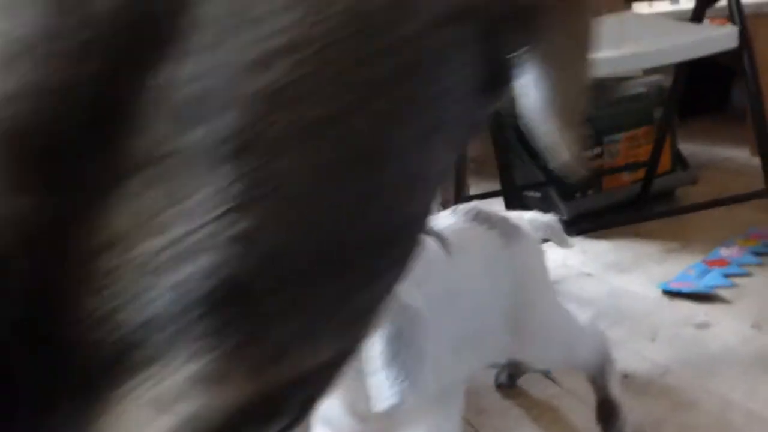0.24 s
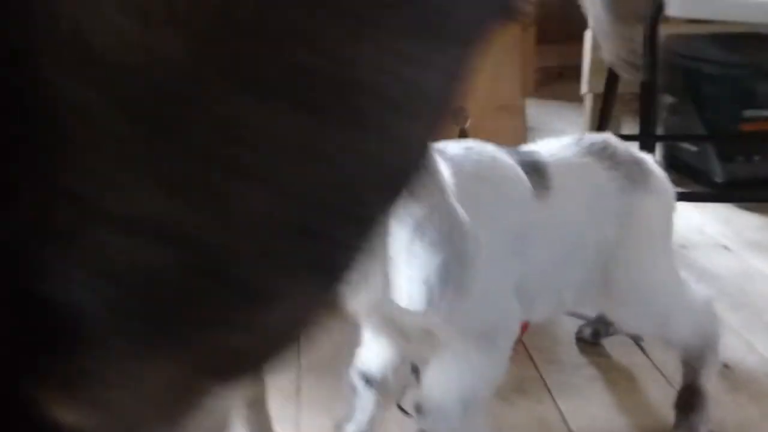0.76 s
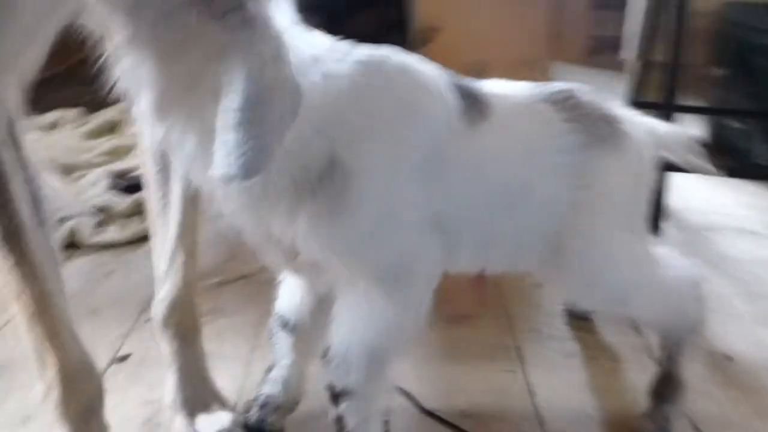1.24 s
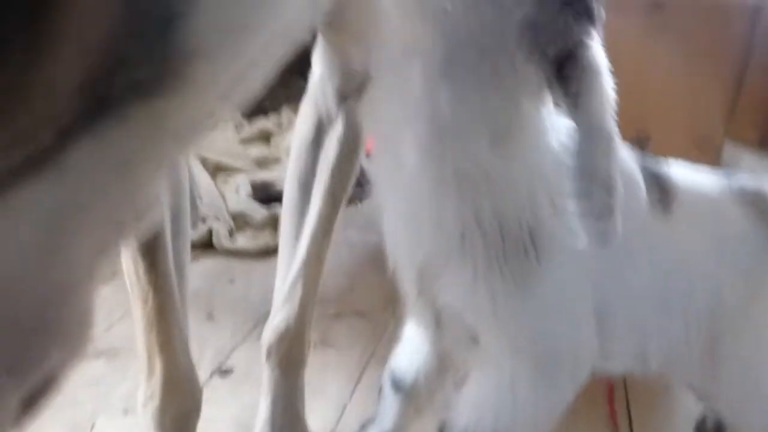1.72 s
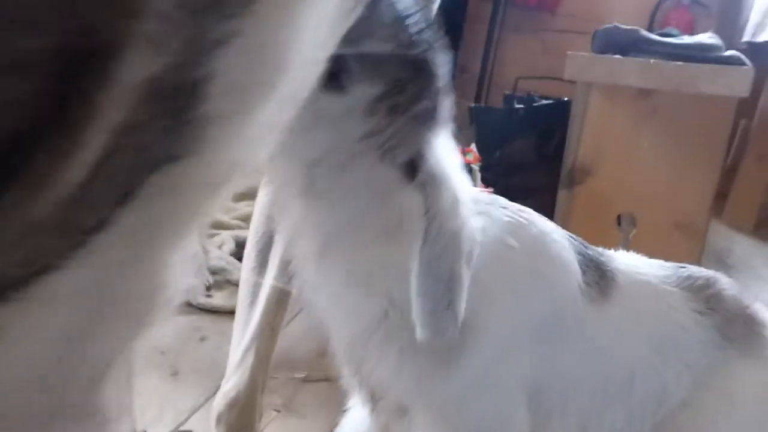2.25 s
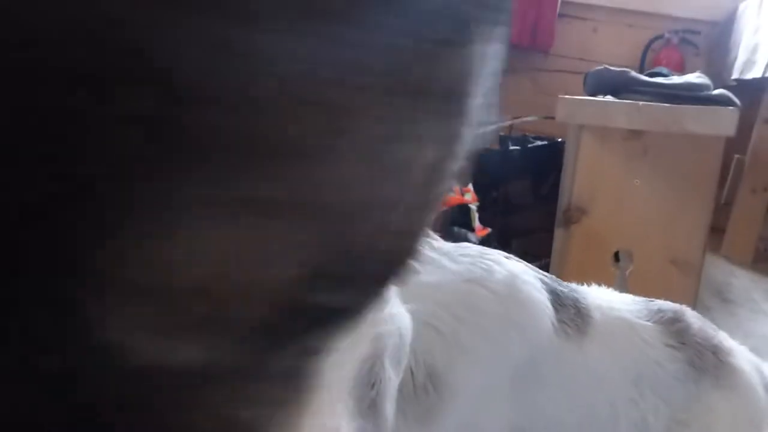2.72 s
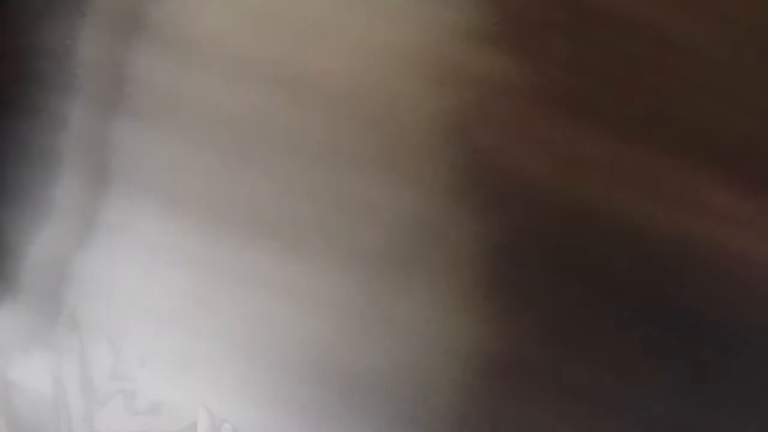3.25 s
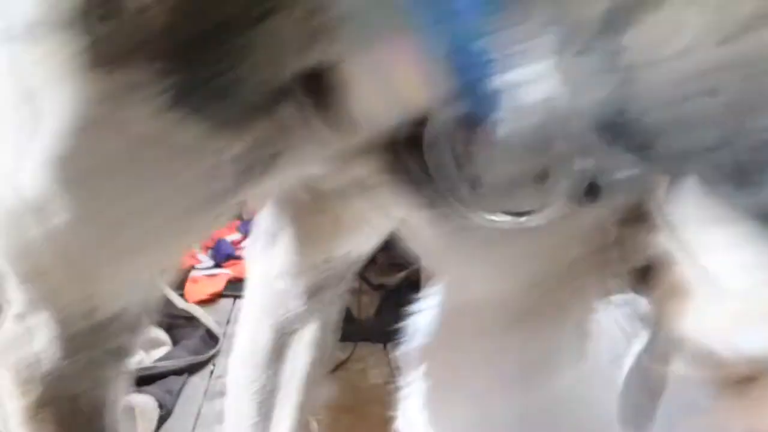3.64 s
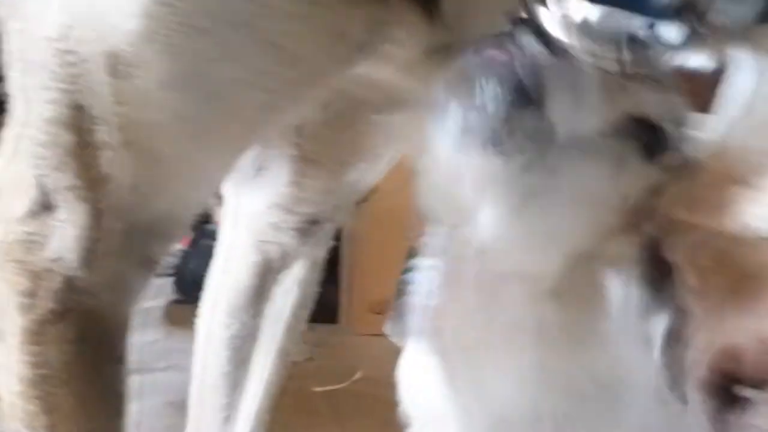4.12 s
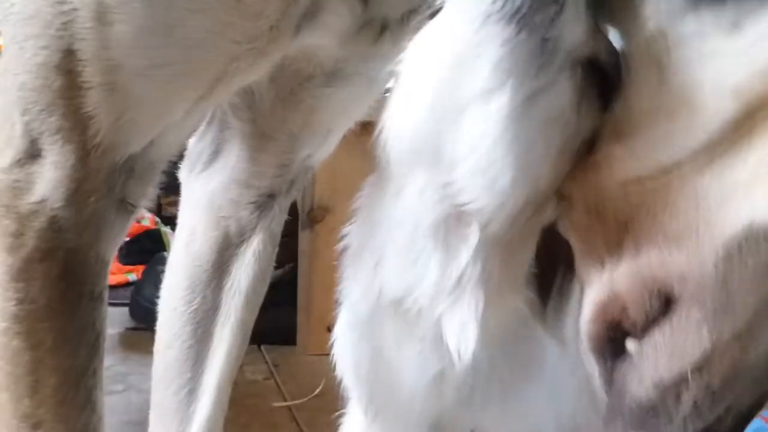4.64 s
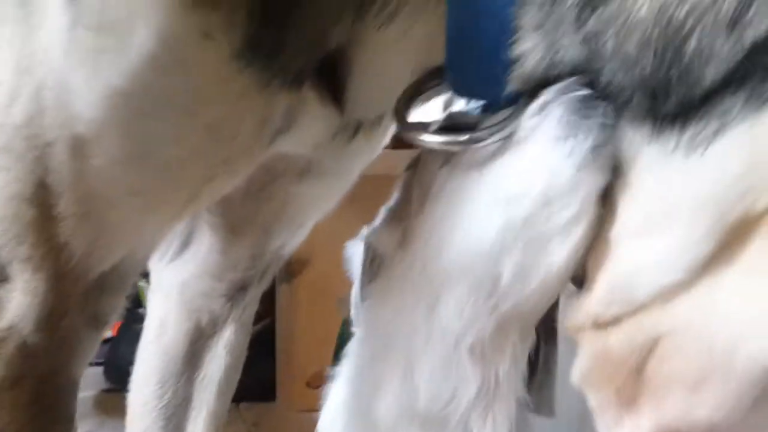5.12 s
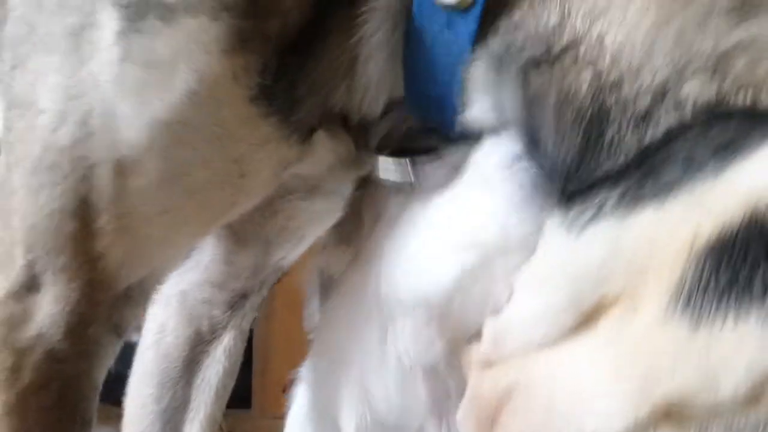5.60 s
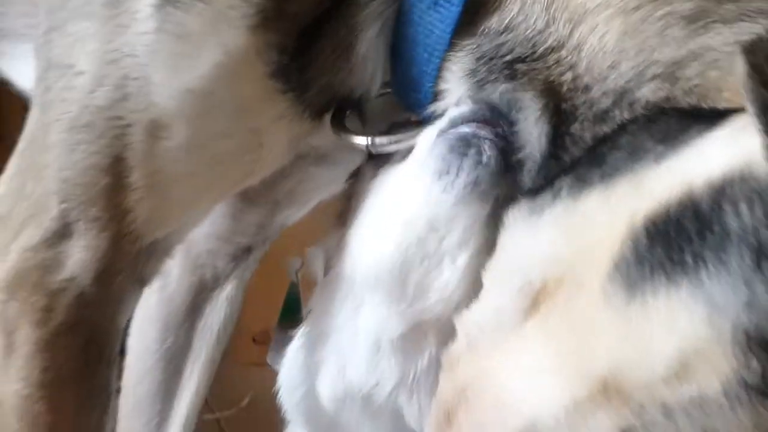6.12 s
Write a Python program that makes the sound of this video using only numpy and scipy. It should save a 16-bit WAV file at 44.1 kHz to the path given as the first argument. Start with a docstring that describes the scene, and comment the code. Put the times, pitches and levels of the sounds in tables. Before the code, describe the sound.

Dogs shuffle and tap on a wooden floor in a small room, then lick and nose close up, with one very loud sharp smack.

```python
"""Dogs lick and nose right beside a phone, after shuffling over a wooden floor in a small room.
Mouths and claws click and one dog snorts: noise bursts in bands. Paws thud as ringing board modes.
Noses sniff, fur brushes brightly once and a nostril whistles: filtered noise. Bodies shove over the boards
and fur rustles: grainy noise that follows the bustle. A short room tail returns a share of the clicks,
thuds and sniffs, over a steady stereo hush."""
import sys
import numpy as np
from scipy import signal
from scipy.fft import rfft, irfft, next_fast_len
from scipy.io import wavfile
from scipy.ndimage import uniform_filter1d

SR = 44100
rng = np.random.default_rng(int(sys.argv[2]) if len(sys.argv) > 2 else 0)


def invert_db(level):
    """Linear amplitude ratio for a level in decibels (20 dB per decade), elementwise."""
    return 10 ** (np.asarray(level, dtype=float) / 20)


def wav_out(sig):
    """Save sig, one row per channel (or a flat mono array), as 16-bit PCM at SR to the path in sys.argv[1]."""
    wavfile.write(sys.argv[1], SR, np.round(np.clip(np.atleast_2d(sig).T, -1, 1) * 32767).astype(np.int16))


N = 280917  # samples

# All peaks and levels are those ahead of the microphone.
# Lips, tongues and collars beside the phone:
# (time [s], peak [dB], centre [Hz], nominal half width [octaves], half length [ms])
MOUTH_CLICKS = [(.3694, -27, 2200, 0.56, 2.26), (1.548, -35, 1460, .47, 2.4),
                (1.8874, -23, 4470, 0.91, 0.18), (1.888, -31, 3450, 0.49, 2.5), (2.058, -48, 9000, .8, .3),
                (2.137, -35.5, 1500, .6, 0.84), (2.4783, -31, 5500, 1.5, 0.64),
                (2.483, -32, 10200, .6, 0.23), (2.5009, -30.5, 5660, 0.93, .32),
                (2.978, -37.5, 1490, 0.62, 1.3), (3.0605, -34.5, 1800, 1.46, 2.4),
                (3.1088, -41, 10500, 0.26, .4), (3.95, -34, 2270, 0.61, .11),
                (4.0218, -37.5, 1230, 0.31, 1), (4.0347, -28, 7000, 0.74, 0.5),
                (4.159, -32, 5800, 1.16, 2.8), (4.1645, -32, 10800, 0.15, 0.43),
                (4.3446, -24, 12000, 0.23, 0.27), (4.3476, -25, 10000, 0.19, 0.31),
                (4.3542, -30, 1520, 1.2, 0.64), (4.355, -17.5, 4660, 0.24, 0.41),
                (4.4006, -28, 3630, 0.52, 0.33), (4.479, -38, 9600, 0.31, .6),
                (4.4871, -29.5, 1310, 0.29, 0.41), (4.4875, -28, 4670, 0.35, 0.18),
                (4.6625, -26.5, 10900, 0.26, 0.33), (4.71, -21, 9500, .45, 1.3),
                (4.7125, 2.5, 9300, 0.49, 0.27), (4.7121, -14.5, 2560, 0.84, 0.72),
                (4.7128, -5, 8200, 0.33, 2.3), (4.7172, -10.5, 7500, 0.91, 1.35),
                (4.7967, -29, 6160, 1.14, .47), (4.901, -39, 12000, 0.45, .37),
                (4.917, -35.5, 11300, 0.3, .3), (4.926, -42, 10500, .3, 0.33),
                (4.976, -13.5, 4460, 2.7, 0.14), (4.982, -26.5, 3530, 0.24, 2.3),
                (4.9812, -22, 6600, 0.076, 1.5), (4.987, -18, 7000, 3.3, 1.75),
                (5.2588, -35.5, 10100, 0.16, .28), (5.311, -25.5, 5550, 1, 5.1),
                (5.318, -5.5, 7440, 0.3, 1), (5.3202, -14, 5800, 1.13, 2.4),
                (5.3224, -15.5, 6700, 0.19, 0.68), (5.323, -14.5, 4280, 0.77, 1.54),
                (5.532, -34, 12500, .4, .45), (5.538, -19, 6360, 0.26, 0.98),
                (5.5376, -25.5, 2970, 1.4, 1.45), (5.543, -25, 8950, 1.4, 0.39),
                (5.8025, -20, 3000, 0.56, 0.036), (5.978, -39, 1790, 0.83, 0.16),
                (6.1359, -23, 3690, 0.86, 0.05), (6.1745, -29, 6000, 1, .29),
                (6.1794, -26, 9500, 0.16, 0.36), (6.189, -29, 7950, 0.86, .3), (6.234, -30, 7000, 3.3, .26),
                (6.239, -33.5, 3400, 0.78, 0.28), (6.331, -22, 3600, 0.88, 0.068)]
# Claws on the floor, across the room; the two rows near 3.32 s are a noisy snort, with its room tail:
# (time [s], peak [dB], centre [Hz], nominal half width [octaves], half length [ms])
CLAWS_AND_SNORT = [(0.2776, -27, 7400, 0.42, 3.2), (.283, -28.5, 2000, 2, 1.05),
                   (.5211, -32.5, 1840, 0.47, 2.2), (0.657, -36.5, 1990, 0.99, 2),
                   (.7303, -30.5, 1200, .65, 0.23), (1.0852, -21.5, 1850, 0.058, .4),
                   (1.0871, -22.5, 3800, 1.1, 2.2), (1.288, -41, 3500, 0.66, 4.2),
                   (1.4168, -35.5, 4000, 0.71, 5.5), (1.845, -39, 3400, .85, 3),
                   (2.119, -40.5, 8000, 0.83, 2.7), (2.169, -40, 4000, .41, .54),
                   (2.213, -40, 9000, 0.65, 0.46), (2.313, -35, 2680, .56, 0.5),
                   (2.399, -34.5, 3820, 0.63, 2.2), (3.3197, -22.5, 6960, 0.79, 2.3),
                   (3.319, -28.5, 4600, 1.4, 13.7), (4.3524, -25.5, 10800, .25, 0.34),
                   (4.404, -32.5, 11100, .55, 1.9), (4.982, -23, 8000, 1.5, 1.8),
                   (5.0842, -33.5, 2470, 0.96, 0.27), (5.161, -37, 3800, 0.26, .28),
                   (6.029, -36, 11200, 0.8, 0.32)]
# Spells of faint crackle: (start [s], end [s], highest peak [dB], lowest centre [Hz], span above it [octaves])
CRACKLE_SPELLS = [(1.951, 2.55, -39, 2600, 2.3), (2.9, 3.159, -46, 3000, 1.9), (4.096, 4.7, -53, 5000, 1.4),
                  (5.399, 6.299, -44.5, 5000, 1.8)]
# Two narrow resonances, probably the microphone's, that colour every click:
# (frequency [Hz], width [Hz], gain [dB])
NARROW_RESONANCES = [(6600, 200, -7), (9050, 310, -9.5)]
# Paws on the boards: (time [s], peak [dB], favoured pitch [Hz], spread [octaves], ring time [factor])
PAW_BLOWS = [(.151, -40, 298, 0.62, 0.58), (.369, -28, 940, 0.48, 0.28), (.52, -41, 585, 0.41, .51),
             (.637, -37.5, 493, 0.5, 1.04), (.73, -30, 477, 0.68, 0.68), (.981, -27.5, 510, 0.23, .28),
             (1.039, -26.5, 510, 0.6, 0.71), (1.088, -24.5, 716, 1.2, 0.36), (1.144, -38, 417, 0.31, .8),
             (1.231, -34.5, 306, 0.18, 0.9), (1.352, -33, 327, 0.55, 0.65), (1.384, -27.5, 252, 0.4, 2.5),
             (1.41, -40, 278, 0.47, 1.3), (1.435, -37, 300, 0.38, 1.4), (1.46, -36.5, 320, .16, 2.3),
             (1.551, -28.5, 590, 0.95, 0.35), (1.668, -34, 303, 0.22, 1.06), (1.916, -36, 473, 0.57, 0.72),
             (1.975, -41, 370, 0.42, .54), (2.077, -41, 317, 0.34, 0.84), (2.263, -37, 450, 0.17, 0.4),
             (2.345, -41, 420, 0.39, 0.77), (3.036, -41, 460, 0.5, 0.6), (3.059, -36.5, 307, 1.22, 2.1),
             (3.097, -38, 407, 0.22, .9), (3.254, -41, 473, .4, 1.8), (3.323, -41, 433, 0.52, 1.7),
             (3.352, -36.5, 333, 0.38, 1), (3.697, -30.5, 367, .53, 0.7), (4.146, -42.5, 271, .45, 1.7),
             (4.466, -39, 550, .65, .38), (4.4883, -29, 1070, 0.72, 0.15), (4.712, -28, 506, 0.67, 0.12),
             (4.796, -41.5, 533, 0.97, 0.51), (4.832, -42.5, 540, .32, 0.39),
             (4.934, -44.5, 297, 1.02, 0.51), (4.985, -35.5, 990, 0.51, .32), (5.084, -34, 730, 0.66, 0.2),
             (5.324, -33.5, 940, .6, 0.27), (5.802, -37, 696, 0.8, 0.21), (5.874, -47, 206, .34, .54),
             (6.145, -25, 272, 0.5, 1.07)]
# Modes of the boards: (frequency [Hz], relative level [dB], t60 before the paw's ring factor [s])
BOARD_MODES = [(193.7, -1.5, 0.13), (256, -1.5, 0.042), (316, 1, 0.053), (392.7, 2, 0.071), (460, 6, 0.05),
               (561, 3.5, 0.064), (730, 10.5, 0.066), (940, 12, 0.054), (1200, 16, 0.042)]
# Air drawn through a nose; the row from 4.989 to 5.25 s is a bright brushing of fur:
# (start [s], end [s], level [dB], bright band against dull [dB])
SNIFFS_AND_BRUSH = [(0, 0.09, -50, 0), (.14, 0.196, -53.5, 5), (2.953, 3.135, -65, -16),
                    (3.202, 3.445, -53.5, -23), (4.989, 5.25, -64, 5), (5.084, 5.25, -57, -11),
                    (5.395, 5.438, -57.5, -20), (6.02, 6.051, -60.5, -16), (6.206, 6.37, -72, -7)]
# How busily the dogs move: (time [s], bodies on the boards [dB], fur against bodies [dB])
MOVEMENT = [(0, -48.5, 2.5), (.22, -51.5, -0.5), (.75, -48, -1.5), (.95, -51, 2), (1.12, -46.5, -3),
            (1.42, -46.5, -0.5), (1.63, -49.5, -3), (1.79, -56.5, -2.5), (2.15, -52, -1.5),
            (2.47, -55.5, 2), (2.79, -62.5, 2), (3.0, -54.5, -2), (3.3, -52, -1.5), (3.65, -50, -1.5),
            (3.9, -54, -4), (4.15, -53, 0.5), (4.45, -53.5, -1), (4.76, -62.5, 0.5), (5.0, -60.5, -1),
            (5.501, -57.5, -1), (5.95, -63, 2.5), (6.2, -53.5, -3), (6.37, -54, 3.5)]
# A body shoves across the boards: (middle [s], length [s], level over the bustle [dB])
BODY_SHOVES = [(3.08, 0.13, 6), (3.353, 0.22, 5), (3.746, 0.069, 1.5), (5.175, .14, 5.5), (5.4, 0.13, 5.5),
               (6.166, 0.057, 6)]
# Colour of bodies on the boards: (frequency [Hz], relative level per Hz [dB])
SHUFFLE_COLOUR = [(29, -72), (50, -42), (69, -56), (92, -24), (134, -21), (171, 3.5), (265, -2), (420, 2.5),
                  (967, -6), (2500, -16.5), (3250, -69), (5500, -120)]
# Colour of brushing fur, before its tilt: (frequency [Hz], relative level per Hz [dB])
RUSTLE_COLOUR = [(410, -57), (700, -8.5), (1870, -6), (2270, -7), (2730, -7.5), (6150, -10.5), (7990, -17),
                 (9990, -12.5), (14600, -25), (15400, -23), (16000, -61)]
# Left-right likeness of the movement: (frequency [Hz], correlation before clipping to -1..1 [1])
MOTION_LIKENESS = [(60, 0.57), (180, 0.98), (550, 0.95), (1650, 0.5), (4970, 0.56), (15000, 0.13)]
# Phase gap between the two microphone ports: (frequency [Hz], lead of the left [rad])
PORT_PHASE = [(0, 0), (780, 0.23), (1460, -0.4), (3190, -1.2), (3960, -0.9), (5170, 0.5), (7060, -0.4),
              (9910, 0.048), (10200, -0.1), (11400, 0.16), (14400, -0.4), (15600, -0.1), (16000, 0.1),
              (16400, 0.19)]
# Decay of the small room: (frequency [Hz], t60 [s])
ROOM_DECAY = [(150, 0.13), (600, 0.075), (2000, 0.21), (6500, 0.2), (10000, 0.14), (15000, 0.046)]
# Colour of the room's hush: (frequency [Hz], relative level per Hz [dB])
HUSH_COLOUR = [(15, -40.5), (25, -23), (145, 12), (384, -14.5), (545, -3), (863, -4.5), (1070, -1),
               (1890, -12), (2280, -7.5), (3160, -14), (10700, -45), (14400, -30), (16000, -42)]
# Left-right likeness of the hush: (frequency [Hz], correlation before clipping to -1..1 [1])
HUSH_LIKENESS = [(60, 0.5), (150, 1.5), (380, -0.98), (950, -1.04), (2380, -0.34), (5980, -0.5),
                 (15000, -1)]
# Response shared by both microphone ports: (frequency [Hz], gain [dB])
MIC_RESPONSE = [(20, -17), (60, -10), (130, -2.5), (300, 1.83), (12000, -1.35), (15000, 4), (15700, -12),
                (16500, -26), (17500, -62.5)]
# Balance of the ports: (frequency [Hz], left over right [dB])
PORT_BALANCE = [(60, -1.1), (500, -1.2), (1200, 1.2), (2500, .9), (5000, .3)]


def evened(x):
    """Scales to rms 1."""
    return x / np.sqrt(np.mean(x ** 2) + 1e-20)


def read(points, hz):
    """Value of a table on a log-frequency axis."""
    f, value = np.transpose(points)
    return np.interp(np.log(hz + 1), np.log(f + 1), value)


def add(mix, s, sound):
    """Mixes a sound in at time s."""
    part = mix[round(s * SR):][:len(sound)]
    part += sound[:len(part)]


def click(hz, octaves, half_ms, noise):
    """A snap and a spatter of noise that swells and breaks off, through two resonances and the click's band."""
    u = np.arange(len(noise)) / SR * 1000 / (2 * max(half_ms, .05))
    swell = (1 - np.exp(-u / .15)) * np.exp(-u ** 3)
    drive = noise * swell * min(half_ms, 1)
    drive[0] += 1.2  # the snap
    for f, width, db in NARROW_RESONANCES:
        drive = drive + invert_db(db) * signal.lfilter(*signal.iirpeak(f, f / width, SR), drive)
    reach = np.array([-abs(octaves) - .02, abs(octaves) + .015])
    edges = np.clip(hz * 2. ** reach, 50, SR * .48)
    banded = signal.sosfilt(signal.butter(2, edges, "band", fs=SR, output="sos"), drive)
    # a duller low body under the snap, stronger in wide clicks
    body = signal.lfilter(*signal.butter(1, [500, 3000], "band", fs=SR), drive)
    sound = banded + invert_db(-12) * min(abs(octaves), 1) ** 2 * body
    return sound / abs(sound).max()


def crackle_ticks():
    """Faint ticks fall at random within each spell, at random levels and pitches."""
    ticks = []
    for start, end, db, low_hz, span in CRACKLE_SPELLS:
        for when, faint, high in rng.random((20, 3)):  # twenty ticks a spell
            s = start + when * (end - start)
            ticks.append((s, db - 7 * faint, low_hz * 2 ** (span * high), .51, .53))
    return ticks


def clicks():
    """Direct clicks and the share that each sends to the room; a louder mouth click is nearer, so sends less."""
    direct, to_room = np.zeros((2, N))
    rows = [(row, -3.5) for row in CLAWS_AND_SNORT]
    for row in MOUTH_CLICKS + crackle_ticks():
        rows.append((row, -15.5 - .25 * (row[1] + 30)))  # room share [dB]
    for (s, db, hz, octaves, half_ms), room_db in rows:
        sound = invert_db(db) * click(hz, octaves, half_ms, rng.standard_normal(2048))
        add(direct, s, sound)
        add(to_room, s, invert_db(room_db) * sound)
    return direct, to_room


def thuds():
    """Each paw rings the slightly detuned board modes near the pitch that its pad favours."""
    out, t = np.zeros(N), np.arange(8000) / SR
    for s, db, centre_hz, spread, ring in PAW_BLOWS:
        sound = np.zeros(len(t))
        for hz, mode_db, t60 in BOARD_MODES:
            away = np.log2(hz / centre_hz) / max(spread, .1)
            decay_db = 60 * t / (t60 * max(ring, .1))
            detuned_hz = hz * (1 + .017 * rng.uniform(-1.5, 1))
            sound += invert_db(mode_db - 9.2 * away ** 2 - decay_db) * np.sin(2 * np.pi * detuned_hz * t)
        sound *= 1 - np.exp(-t * centre_hz / .57)  # a softer pad loads the board more slowly
        add(out, s, invert_db(db) * sound / abs(sound).max())
    return out


def sniffs_and_brush():
    """Smooth rushes of noise, part dull and part bright: sniffed air and one bright brushing of fur."""
    out = np.zeros(N)
    for start, end, db, bright_db in SNIFFS_AND_BRUSH:
        noise = rng.standard_normal(round((end - start) * SR))
        dull = signal.lfilter(*signal.butter(1, [1200, 5500], "band", fs=SR), noise)
        bright = signal.lfilter(*signal.butter(1, [7000, 14000], "band", fs=SR), noise)
        rush = evened(dull + invert_db(bright_db) * bright)
        add(out, start, invert_db(db) * rush * signal.windows.tukey(len(noise), .6))
    return out


def whistle():
    """A nostril whistles as the dog draws air: noise in a narrow resonance of fixed width that climbs in pitch."""
    start_s, length_s, level_db, edge_db = 6.19, .17, -62, -16
    low_hz, rise_hz_per_s, width_hz = 12000, 24000, 700
    t = np.arange(N) / SR - start_s
    u = t / length_s
    pole = np.exp(-np.pi * width_hz / SR)
    fuzz = signal.lfilter([1], [1, -pole], rng.standard_normal(N) + 1j * rng.standard_normal(N))
    hz = low_hz + rise_hz_per_s * np.clip(t, 0, length_s)
    tone = evened((fuzz * np.exp(2j * np.pi * np.cumsum(hz) / SR)).real)
    arch_db = level_db + edge_db * np.clip(2 * u - 1, -1, 1) ** 2
    return tone * invert_db(arch_db) * (u > 0) * (u < 1)


def motion(t, column):
    """One control of the movement at times t."""
    rows = np.array(MOVEMENT)
    return np.interp(t, rows[:, 0], rows[:, column])


def boards_db(t):
    """Level of bodies on the boards: the bustle, swollen by each shove."""
    db = motion(t, column=1)
    for s, length, shove_db in BODY_SHOVES:
        db = db + shove_db * np.clip(1 - (2 * (t - s) / length) ** 4, 0, 1)
    return db


def fur_db(t):
    """Level of the fur, which brushes in step with the bodies."""
    return motion(t, column=1) + motion(t, column=2)


def fur_tilt_db(hz, t):
    """Stronger brushing sounds duller: the tilt about 4 kHz falls with the fur's level."""
    db_per_octave = .4 - .13 * (fur_db(t) + 55.5)
    return np.outer(np.log2((hz + 50) / 4000), db_per_octave)


def texture(colour, likeness, per_s, grain_db, grit, patchy_db, tilt_db=None):
    """Stereo noise with scattered grains of random size, coloured and patchy in time and pitch."""
    struck = rng.random(N) < per_s / SR
    grains = invert_db(grain_db * np.minimum(rng.exponential(1, N), 3)) * struck
    both, apart = rng.standard_normal((2, N))
    both = evened(both + grit * evened(grains * both))
    hz, t, (left, other) = signal.stft([both, apart], SR, nperseg=512, noverlap=384)
    same = np.clip(read(likeness, hz), -1, 1)[:, None]
    z = np.array([left, same * left + np.sqrt(1 - same ** 2) * other])
    patches = rng.standard_normal((len(hz), len(t)))
    patches = uniform_filter1d(uniform_filter1d(patches, size=8, axis=0), size=16, axis=1)
    field_db = read(colour, hz)[:, None] + patchy_db * evened(patches)
    if tilt_db:
        field_db = field_db + tilt_db(hz, t)
    power = np.mean(invert_db(read(colour, hz)) ** 2)
    sound = signal.istft(z * invert_db(field_db), SR, nperseg=512, noverlap=384)[1][:, :N]
    return sound / np.sqrt(power)


def movement():
    """Bodies shuffle on the boards and fur rustles, each a grainy noise at the level of the bustle."""
    t = np.arange(N) / SR
    shuffle = texture(SHUFFLE_COLOUR, MOTION_LIKENESS, per_s=200, grain_db=3, grit=.5, patchy_db=2.1)
    rustle = texture(RUSTLE_COLOUR, MOTION_LIKENESS, per_s=300, grain_db=3.5, grit=.3, patchy_db=.8,
                     tilt_db=fur_tilt_db)
    return invert_db(boards_db(t)) * shuffle + invert_db(fur_db(t)) * rustle


def ports(x):
    """A sound reaches the two microphone ports with a phase gap that varies with frequency."""
    half = np.exp(.5j * read(PORT_PHASE, np.fft.rfftfreq(N, 1 / SR)))
    return irfft(rfft(x) * np.array([half, 1 / half]), N)


def room(x):
    """A dense, partly shared tail for each ear, each band dying at its own speed."""
    left, right, shared = rng.standard_normal((3, SR // 2))
    onset = np.clip(np.arange(SR // 2) / (.0038 * SR), 0, 1) ** 2  # the walls answer late
    taps = (np.array([left, right]) + 1.3 * shared) * onset
    hz, t, z = signal.stft(taps, SR, nperseg=256)
    tail = signal.istft(z * invert_db(-60 * t / read(ROOM_DECAY, hz)[:, None]), SR, nperseg=256)[1]
    return signal.fftconvolve(x[None], tail / np.linalg.norm(tail[0]), axes=1)[:, :N]


def room_hush():
    """The steady hush of the room: coloured noise with hardly any grain."""
    return invert_db(-58) * texture(HUSH_COLOUR, HUSH_LIKENESS, per_s=50, grain_db=3, grit=.05, patchy_db=.6)


def scene():
    """Clicks, rushes of noise and whistle, paws, the room's answer, movement and hush."""
    direct, to_room = clicks()
    paws, rushes = thuds(), sniffs_and_brush()
    struck = ports(direct + rushes + whistle()) + paws
    answer = room(to_room + invert_db(-14.5) * paws + invert_db(-1.5) * rushes)
    return struck + answer + movement() + room_hush()


def roll_off(x):
    """The treble ends steeply here."""
    return signal.sosfilt(signal.butter(12, 16790, fs=SR, output="sos"), x)


def record(dry):
    """The loudest smack rounds off near full scale; the microphones thin deep bass and top treble."""
    size = next_fast_len(N + 4096)
    hz = np.fft.rfftfreq(size, 1 / SR)
    response_db = read(MIC_RESPONSE, hz) + np.outer([.5, -.5], read(PORT_BALANCE, hz))
    rounded = 1.3 * np.tanh(dry / 1.3)
    heard = irfft(rfft(rounded, size) * invert_db(response_db), size)[:, :N]
    return roll_off(heard)


dry = scene()
out = record(dry)
wav_out(out)
```